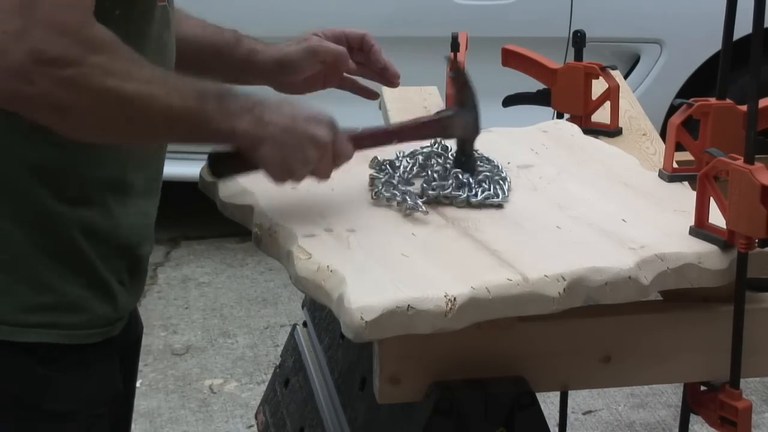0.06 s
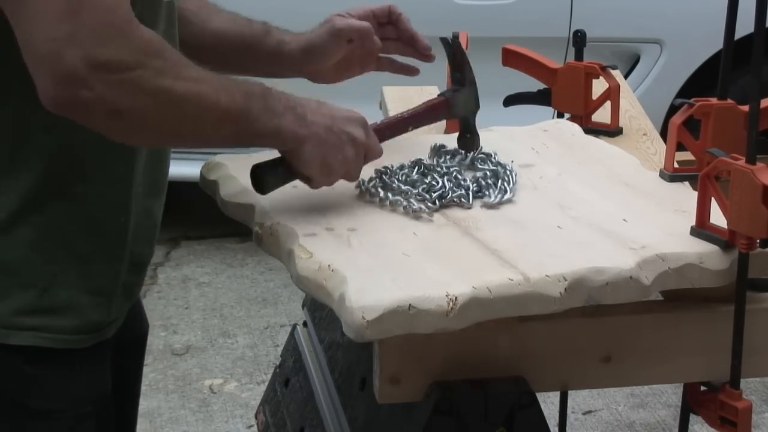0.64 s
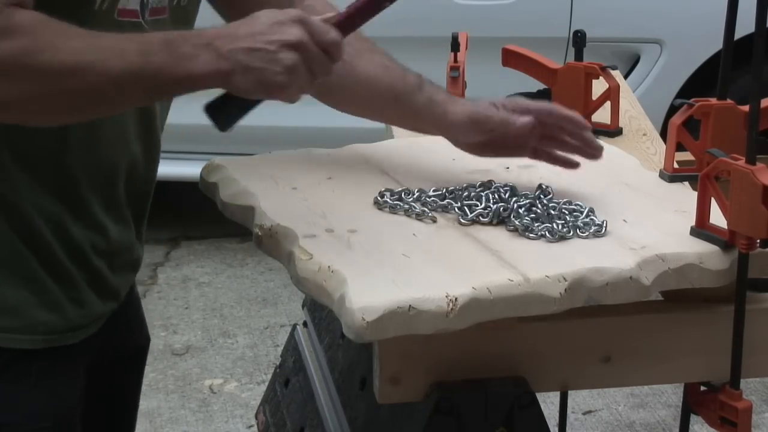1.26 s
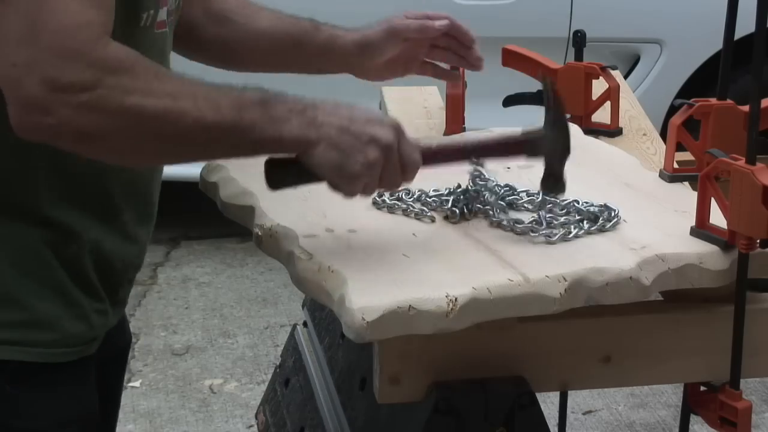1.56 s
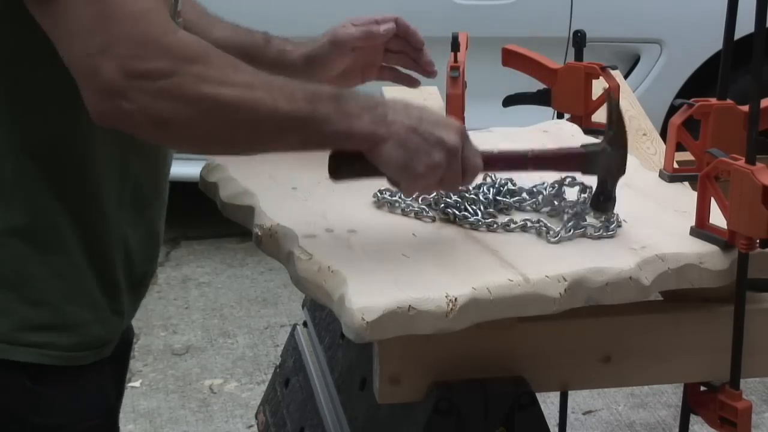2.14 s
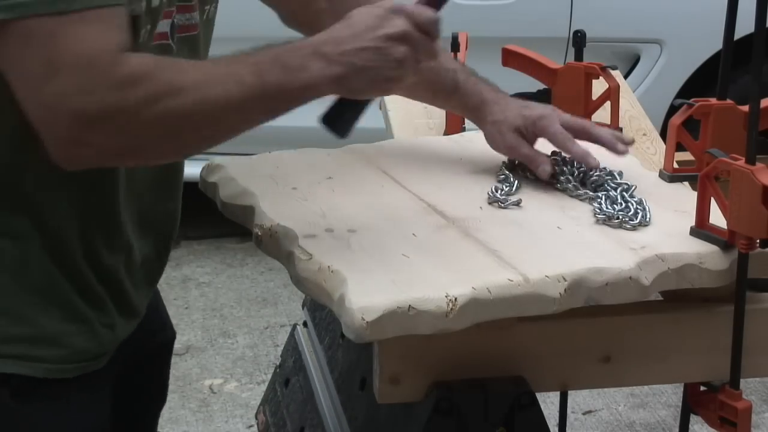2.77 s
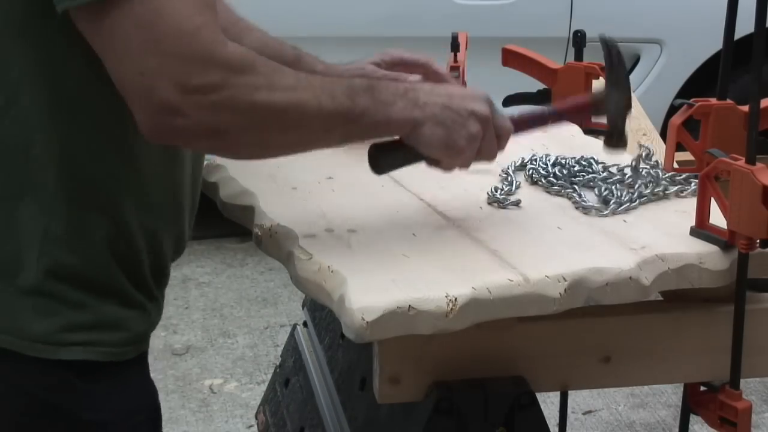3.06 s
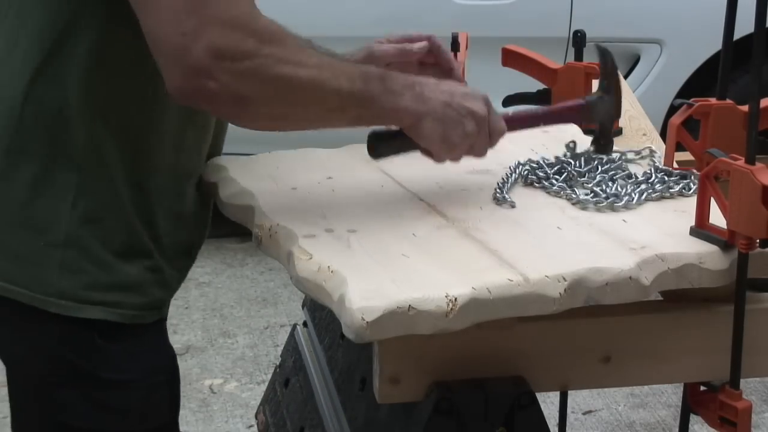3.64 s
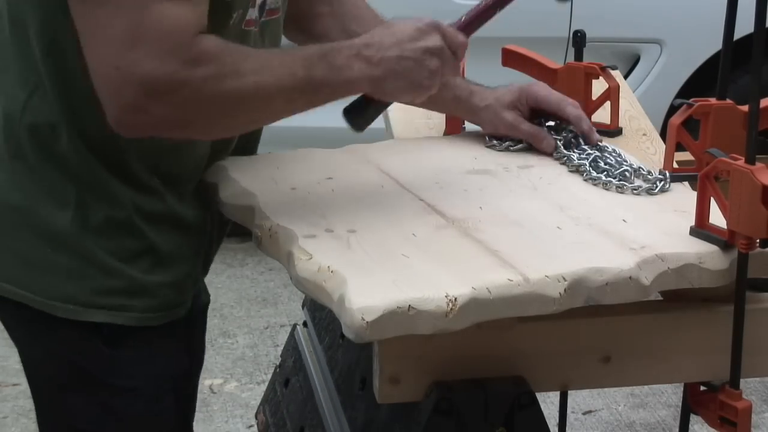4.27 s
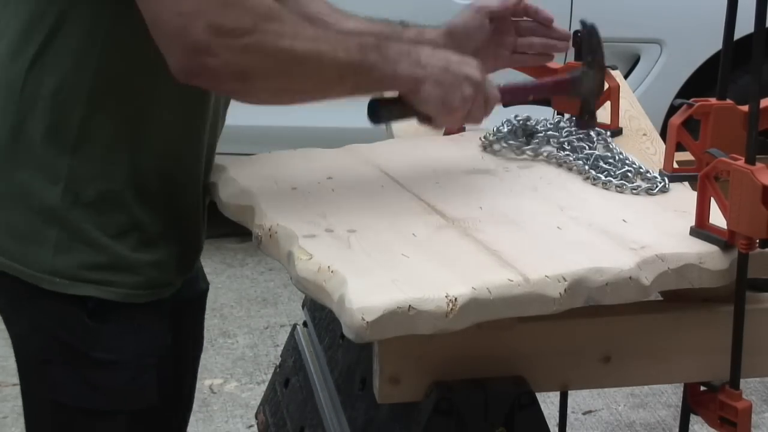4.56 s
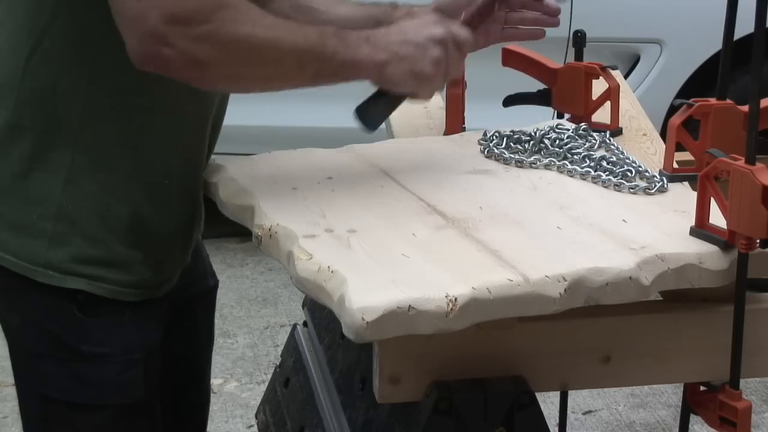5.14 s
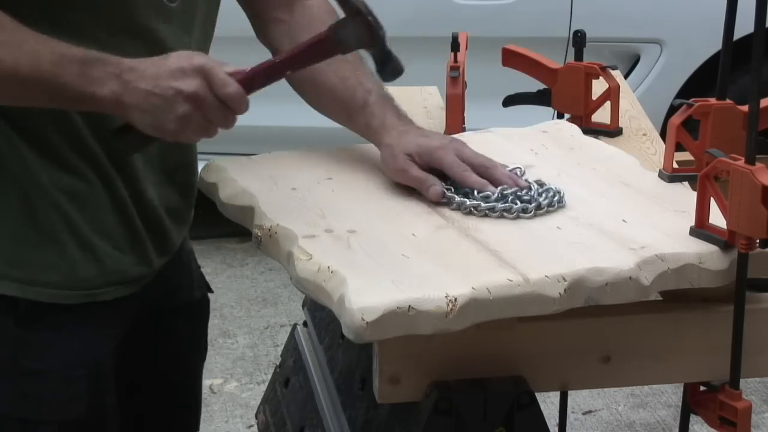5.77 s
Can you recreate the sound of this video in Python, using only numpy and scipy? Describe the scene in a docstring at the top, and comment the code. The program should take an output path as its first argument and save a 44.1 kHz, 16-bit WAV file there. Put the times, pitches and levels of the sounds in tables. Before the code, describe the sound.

Sharp hammer blows thud on a heap of chain over wood, with metallic rattles and a hand shoving the links together in between.

```python
"""Hammering a heap of chain

A hammer hits steel chain on a thick wooden board twelve times, in sets of three. Each blow cracks,
sets the board booming and the hammer head ringing, and throws up links that rattle back down.
After each set a hand shoves the chain together. Dull pops sound on the left. Two widely spaced
microphones, the left one nearer, overload on the hardest blows."""
import sys
import numpy as np
from scipy import signal
from scipy.fft import rfft, irfft
from scipy.io import wavfile

SR = 44100
rng = np.random.default_rng(int(sys.argv[2]) if len(sys.argv) > 2 else 0)


def bounce(signal):
    """Save signal as a 16-bit WAV file at the path given by the first command-line argument."""
    frames = np.transpose(np.atleast_2d(signal))
    limited = np.clip(frames, -1, 1)
    pcm = np.round(limited * 32767).astype(np.int16)
    wavfile.write(sys.argv[1], SR, pcm)


N = 264763
TIME = np.arange(N) / SR
AGE = np.arange(SR // 2) / SR  # seconds since one short sound began
RIGHT_DELAY_S, TOP_HZ = .0036, 16000


def amp(db):
    """Turn decibels into a number to multiply by."""
    return 10 ** (np.asarray(db) / 20)


def fade(t60):
    """A struck thing dies away, losing 60 dB in its fade time of t60 seconds."""
    return np.exp(-np.log(1000) * AGE / t60)


def add(track, sound, at):
    """Mix a sound into one channel at a time in seconds."""
    i = max(int(at * SR), 0)
    track[i:i + len(sound)] += sound[:max(N - i, 0)]


def level_at(hz, points):
    """Read the level at any pitch from a curve through (pitch [Hz], level [dB]) points."""
    pitches, db = np.transpose(points)
    return np.interp(np.log(np.maximum(hz, 1)), np.log(pitches), db)


def tint(x, points, size=2048):
    """Shape the bass and treble: plain white noise comes out at the given levels per kHz."""
    gain = amp(level_at(np.arange(size // 2 + 1) * SR / size, points)) * np.sqrt(SR / 2000)
    # build the filter so that nothing sounds before the hit that causes it
    cepstrum = irfft(np.log(gain)) * (1 + np.sign(size // 2 - np.arange(size)))
    cepstrum[0] /= 2
    return signal.fftconvolve(x, irfft(np.exp(rfft(cepstrum))))[:len(x)]


def waver(time, rate_hz, depth_db, points):
    """A loudness that wanders up and down at random."""
    levels = depth_db * rng.standard_normal(points)
    return amp(np.interp(time * rate_hz, np.arange(points), levels))


def ring(tones, scatter_db):
    """A struck thing rings with its own tones; their strength and phase vary from hit to hit."""
    chance = rng.standard_normal((len(tones), 2))
    return sum(amp(db + scatter_db * luck) * fade(t60) * np.sin(2 * np.pi * (hz * AGE + phase))
               for (hz, db, t60), (luck, phase) in zip(tones, chance))


def clicks(count, per_s, spread_db, click_s):
    """Links touch in tiny bursts of noise, some louder than others."""
    sizes = amp(spread_db * np.minimum(rng.exponential(size=count), 4))
    touches = sizes * (rng.random(count) < per_s / SR)
    power = signal.lfilter([1], [1, -np.exp(-1 / (click_s * SR))], touches ** 2)
    return np.sqrt(power / power.mean()) * rng.standard_normal((2, count))


# tone of the background air: (pitch [Hz], relative level [dB])
AIR_COLOUR = [(18, -27.5), (30, -5.5), (102, -15.5), (147, -11), (260, -9), (415, -18), (581, -9),
              (2700, -26), (9640, -28), (15000, -28.5)]


def air(left_db=-57.5, right_db=-61.5):
    """A faint, steady hush, different at each microphone."""
    noise = np.array([tint(rng.standard_normal(N), AIR_COLOUR) for _ in range(2)])
    return noise / noise.std(axis=1, keepdims=True) * amp([[left_db], [right_db]])


# tones the board rings with: (pitch [Hz], level [dB], fade time [s])
BOARD_TONES = [(233, -8, 0.17), (351, -4.5, 0.16), (406, 9.5, 0.082), (461, 3, 0.082), (600.8, 5.5, 0.09),
               (641, -4, 0.15), (679.2, 5.5, 0.11), (778, 2.5, 0.067), (865, -2, 0.12), (1031, 1.5, 0.11),
               (1100, -5.5, 0.086), (1215, -4, .13), (1636.4, 3, 0.067), (1717, -1, 0.075),
               (2180, -9, 0.099), (2405, -9.5, 0.11)]
# tones the hammer head rings with: (pitch [Hz], level [dB], fade time [s])
HEAD_TONES = [(6022, 9, .26), (6345, -4, 0.13)]
# the board's thud, a blur of many short tones: (pitch [Hz], level [dB])
THUD_COLOUR = [(40, 0), (90, -7), (140, 5.5), (240, 4.5), (380, 12.5), (750, 13), (1200, 9.5), (1700, 8.5),
               (2200, 3), (3500, 0.5), (7000, -15), (15000, -38)]
# the crack of steel crushed against steel: (pitch [Hz], level [dB])
CRACK_COLOUR = [(500, -26.5), (2500, 3.5), (5000, 0.5), (8000, -3.5), (12000, -4), (16000, -10)]
# hammer blows: (time [s], board lows [dB], board middle [dB], board highs [dB], crack [dB],
# head ring [dB], rattle [dB], bouncing time [s], favoured board pitch [Hz])
HAMMER_BLOWS = [(0.0402, -19.5, -14, -17.5, -19, -42.5, -28.5, 0.095, 1040),
                (0.3558, -11, -6, -7.5, -19, -34.5, -27.5, .125, 1720),
                (0.6777, -13, -11, -14.5, -15, -51, -31, 0.13, 1720),
                (1.514, -20, -19.5, -17, -18.5, -42.5, -34.5, 0.2, 2420),
                (1.838, -13, -10, -17.5, -17, -40.5, -33.5, 0.16, 1720),
                (2.1412, -11, -11, -18.5, -19, -53, -34.5, 0.21, 1030),
                (2.9945, -22, -12.5, -21.5, -19, -35.5, -33, 0.2, 400),
                (3.3526, -19, -16, -20, -20.5, -31, -35, 0.12, 1680),
                (3.6456, -19, -9, -17, -20.5, -44, -33, 0.083, 776),
                (4.5378, -24, -15.5, -17, -22.5, -52, -31, 0.1, 1715),
                (4.8749, -20.5, -9.5, -15.5, -18.5, -49.5, -31.5, 0.13, 776),
                (5.2667, -17.5, -12.5, -19, -18, -36.5, -32, 0.26, 400.6)]


def hammer(push_s=.0015, rebound_s=.0017, favour_db=6, right_db=-1.08, ring_right_db=6):
    """The head crushes the links, pushes the board and bounces off ringing."""
    out = np.zeros((2, N))
    push = 1 - np.exp(-AGE / push_s)
    rebound = 1 - np.exp(-AGE / rebound_s)  # the head rings once it is free of the chain
    for at, low, middle, high, crack_db, head_db, _, _, favoured_hz in HAMMER_BLOWS:
        # the spot that is struck decides which of the board's tones answer most
        spot = [(380, low), (720, middle), (1800, high)]
        tones = []
        for hz, db, t60 in BOARD_TONES:
            boost_db = favour_db * np.exp(-(np.log(hz / favoured_hz) / .03) ** 2)
            tones.append((hz, db + level_at(hz, spot) + boost_db, t60))
        thud_colour = [(hz, db + level_at(hz, spot)) for hz, db in THUD_COLOUR]
        crush = clicks(len(AGE), per_s=3500, spread_db=2.4, click_s=.0005)
        for mic in (0, 1):  # left, right
            boom = ring(tones, scatter_db=2.5)
            thud = tint(rng.standard_normal(len(AGE)) * fade(.078), thud_colour)
            crack = amp(crack_db) * tint(crush[mic] * fade(.037), CRACK_COLOUR)
            hit = amp(mic * right_db) * (push * (boom + thud) + crack)
            head = amp(head_db + mic * ring_right_db) * rebound * ring(HEAD_TONES, scatter_db=0)
            head *= waver(AGE, rate_hz=45, depth_db=2.2, points=200)  # it turns as it lifts away
            add(out[mic], hit + head, at + mic * RIGHT_DELAY_S)
    return out


def pings(count, per_s=600, t60=.031, spread_db=2):
    """Single links ring very briefly, each at its own pitch."""
    age, decay = AGE[:512], fade(t60)[:512]
    out = np.zeros((2, count + len(age)))
    for at, pitch, size, *phases in rng.random((int(per_s * count / SR), 5)):
        i = int(at * count)
        tone = np.sin(2 * np.pi * (pitch * TOP_HZ * age + np.array(phases)[:, None]))
        out[:, i:i + len(age)] += amp(-spread_db * np.log(size + .02)) * decay * tone
    return out[:, :count] / out.std()


def jostle(count, click_db=-1, ping_db=-8):
    """Moving links both click and ping."""
    ticks = clicks(count, per_s=900, spread_db=2.9, click_s=.0011)
    return amp(click_db) * ticks + amp(ping_db) * pings(count)


# light links bring out the board's higher tones: (pitch [Hz], boost [dB])
TAP_BOOST = [(230, -4.5), (400, -2), (700, 3), (1100, 9), (1700, 5), (2400, -2.5)]


def on_board(contacts, colour, board_db):
    """Links make their own sound and also tap the board into ringing."""
    tones = [(hz, db + level_at(hz, TAP_BOOST), t60) for hz, db, t60 in BOARD_TONES]
    one_tap = ring(tones, scatter_db=.5)
    taps = signal.fftconvolve(contacts, one_tap / np.linalg.norm(one_tap))[:len(contacts)]
    return tint(contacts, colour) + amp(board_db) * taps


# links knocking on each other and on the wood: (pitch [Hz], level [dB])
RATTLE_COLOUR = [(60, -44.5), (130, -24.5), (230, -4.5), (450, -8), (700, 3), (1100, -0.5), (1800, -2.5),
                 (2800, -8.5), (4500, -14), (7000, -22), (11000, -18.5), (16000, -24)]


def rattle(throw_db=5.5, bounce_db_per_s=109, rest_db_per_s=187):
    """After each blow the links jump, lose height as they bounce, then quickly come to rest."""
    contacts = np.zeros((2, N))
    for at, *_, rattle_db, bounce_s, _ in HAMMER_BLOWS:
        lost_db = bounce_db_per_s * np.minimum(AGE, bounce_s)
        lost_db += rest_db_per_s * np.maximum(AGE - bounce_s, 0)
        links = amp(rattle_db + throw_db - lost_db) * jostle(len(AGE))
        for mic in (0, 1):
            add(contacts[mic], links[mic], at)
    return np.array([on_board(side, RATTLE_COLOUR, board_db=-4.5) for side in contacts])


# single links chinking clearly: (time [s], level [dB], pitch [Hz])
LINK_CHINKS = [(0.072, -23.5, 8470), (2.167, -27, 8240), (2.845, -35.5, 4320), (5.971, -38.5, 9400)]


def chinks(t60=.035, width=.07):
    """One link hits another squarely and rings for a moment around one pitch."""
    out = np.zeros((2, N))
    for at, db, hz in LINK_CHINKS:
        edges_hz = [hz * (1 - width / 2), hz * (1 + width / 2)]
        band = signal.butter(2, edges_hz, "band", fs=SR, output="sos")
        for mic in (0, 1):
            tone = signal.sosfilt(band, rng.standard_normal(len(AGE)))
            add(out[mic], amp(db) * fade(t60) * tone / tone.std(), at)
    return out


# loops of chain dropping on the board: (time [s], relative level [dB], clink pitch [Hz])
LOOP_DROPS = [(0.131, -23, 3240), (0.7648, -21.5, 2720), (0.9475, -31, 2840), (1.6417, -28.5, 3870),
              (1.6717, -29.5, 2600), (2.3042, -34.5, 3400), (2.4593, -26.5, 2880), (3.087, -27.5, 3350),
              (3.1239, -27, 3250), (3.2052, -31, 3360), (4.0518, -27.5, 3160), (4.304, -36, 1980),
              (4.397, -41, 1814), (4.446, -46, 2800), (4.994, -26, 3480), (5.3558, -22, 3520)]


def drops(t60=.063, gain_db=-4, clink_db=11, clink_width=.064):
    """A loop of several links lands almost at once and clinks around its own pitch."""
    out = np.zeros((2, N))
    pitches = np.geomspace(60, TOP_HZ, 60)
    for at, db, hz in LOOP_DROPS:
        clink = clink_db * np.exp(-(np.log(pitches / hz) / clink_width) ** 2)
        colour = np.column_stack([pitches, level_at(pitches, RATTLE_COLOUR) + clink])
        for mic in (0, 1):
            burst = rng.standard_normal(len(AGE)) * fade(t60)
            add(out[mic], amp(db + gain_db) * tint(burst, colour), at)
    return out


# links sliding under the hand: (pitch [Hz], level [dB])
SLIDE_COLOUR = [(60, -40), (150, -19.5), (280, -33), (420, -5.5), (700, -1), (1200, -4), (2000, -8),
                (3500, -13), (6000, -15), (10000, -14.5), (16000, -18.5)]
# shoves: (time [s], time to full speed [s], level [dB], slowing [dB/s], treble boost [dB])
HAND_SHOVES = [(0.928, 0.097, -33, 84, 1), (2.40, 0.077, -33, 69.5, -2.5), (2.74, 0.047, -53, 44, 2.5),
               (3.92, 0.17, -36.5, 55.5, -1), (5.33, 0.23, -39.5, 9, -1.5)]


def shoves(treble_hz=4500, longest_s=.68, swell_power=1.01, dulling_db_per_s=26):
    """A hand drags the heap over the wood: it speeds up, catches and slips, then slows."""
    low_gain, treble_gain = np.zeros(N), np.zeros(N)
    for at, rise_s, db, slowing, treble_db in HAND_SHOVES:
        age = TIME - at
        coasting_s = np.maximum(age - rise_s, 0)
        swell = np.clip(age / rise_s, 0, 1) ** swell_power
        speed = swell * amp(db - slowing * coasting_s) * (age < longest_s)
        low_gain += speed
        # the heap sounds duller as it closes up
        treble_gain += speed * amp(treble_db - dulling_db_per_s * coasting_s)
    catches = waver(TIME, rate_hz=45, depth_db=1.5, points=400)
    links = jostle(N) * catches
    slide = np.array([on_board(side, SLIDE_COLOUR, board_db=-2) for side in links])
    low = signal.sosfiltfilt(signal.butter(2, treble_hz, fs=SR, output="sos"), slide)
    return low_gain * low + treble_gain * (slide - low)


# pops close to the left microphone: (time [s], relative level [dB], pitch [Hz])
DULL_POPS = [(1.094, -16.5, 714), (1.3604, -29.5, 864), (2.0282, -21, 599), (2.1156, -16, 617),
             (2.4014, -10, 756), (2.7658, -26, 207), (3.1775, -16.5, 1110), (3.823, -10, 737),
             (5.6165, -20, 664)]


def pops(fade_cycles=2.4, gain_db=6, right_db=-22):
    """Dull pops, each a tone that is gone after barely more than one wave."""
    out = np.zeros(N)
    for at, db, hz in DULL_POPS:
        add(out, amp(db + gain_db) * fade(fade_cycles / hz) * np.sin(2 * np.pi * hz * AGE), at)
    out = signal.sosfilt(signal.butter(2, [220, 4000], "band", fs=SR, output="sos"), out)
    return np.array([out, amp(right_db) * out])


def scrape(at=2.84, width_s=.07, db=-59, edges_hz=(4000, 4600)):
    """Two links grind thinly as the hand presses on the heap."""
    band = signal.butter(2, edges_hz, "band", fs=SR, output="sos")
    grind = signal.sosfilt(band, clicks(N, per_s=900, spread_db=2.5, click_s=.002))
    swell = np.exp(-((TIME - at) / width_s) ** 2)
    return amp(db) * swell * grind / grind.std()


# tone of the room's echo: (pitch [Hz], relative level [dB])
ECHO_COLOUR = [(60, 9.5), (220, 7), (600, 8), (2000, 11.5), (6000, -1), (15000, -3.5)]


def room(x, t60=.4, echo_db=-24, build_s=.0077):
    """Nearby surfaces send back a short, dull wash of echoes."""
    tails = rng.standard_normal((2, len(AGE))) * fade(t60) * (1 - np.exp(-AGE / build_s))
    tails = np.array([tint(tail / np.linalg.norm(tail), ECHO_COLOUR) for tail in tails])
    return amp(echo_db) * signal.fftconvolve(x, tails / np.sqrt(SR / 2000), axes=1)[:, :N]


def scene(lean_db=1):
    """The chain lies nearer the left microphone, so it is louder and earlier there."""
    left, right = rattle() + shoves() + drops() + chinks() + scrape()
    right = np.interp(TIME - RIGHT_DELAY_S, TIME, right, left=0)
    direct = hammer() + np.array([left * amp(lean_db), right * amp(-lean_db)])
    return direct + room(direct) + pops() + air()


def record(dry):
    """Overload flattens the loudest peaks, then the very highest treble is cut."""
    treble_cut = signal.ellip(8, .02, 50, TOP_HZ, fs=SR, output="sos")
    return signal.sosfiltfilt(treble_cut, np.clip(dry, -1, 1))


dry = scene()
out = record(dry)
bounce(out)
```